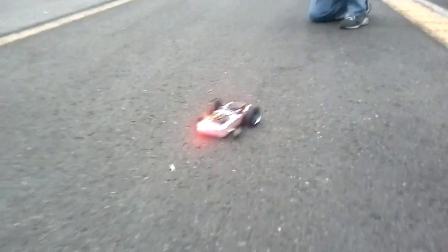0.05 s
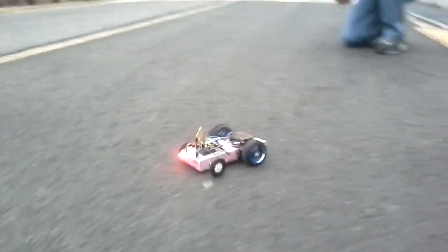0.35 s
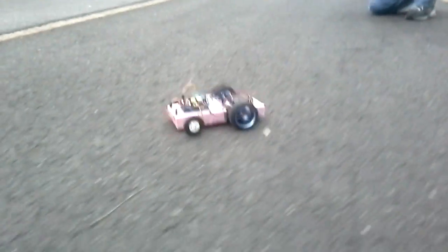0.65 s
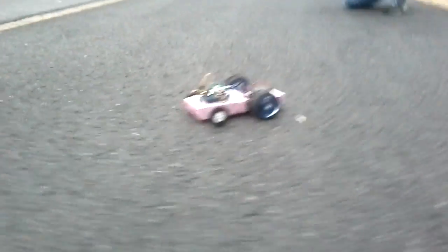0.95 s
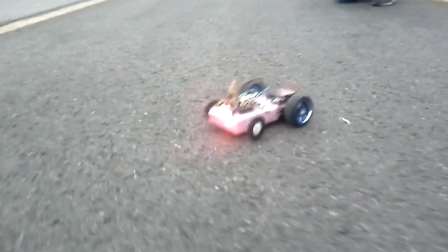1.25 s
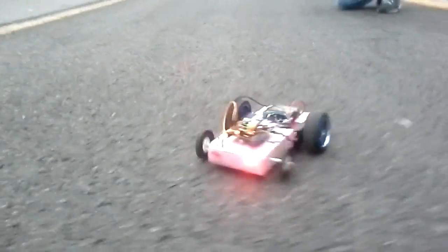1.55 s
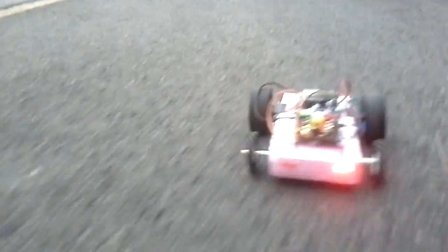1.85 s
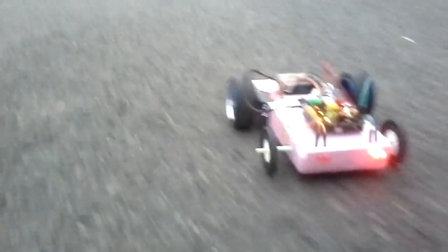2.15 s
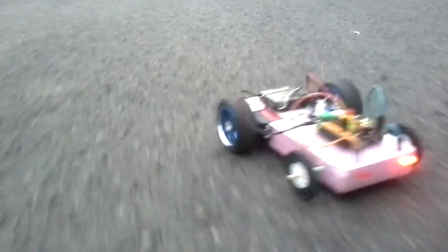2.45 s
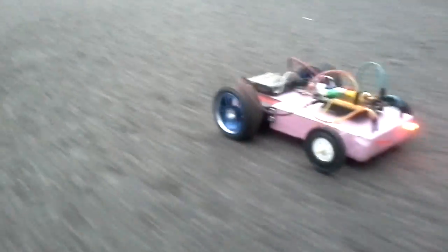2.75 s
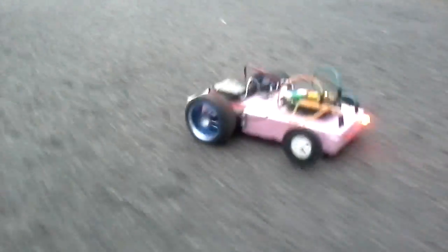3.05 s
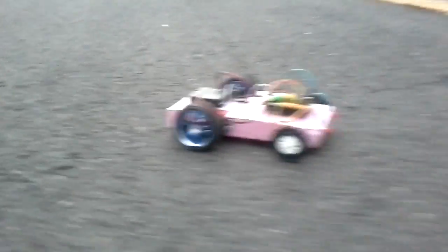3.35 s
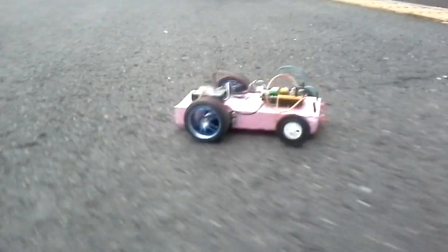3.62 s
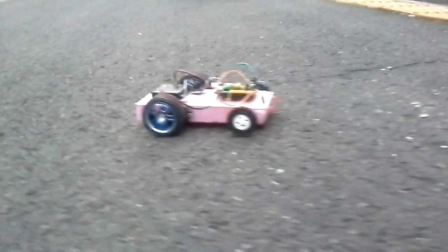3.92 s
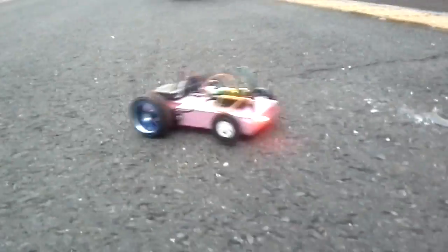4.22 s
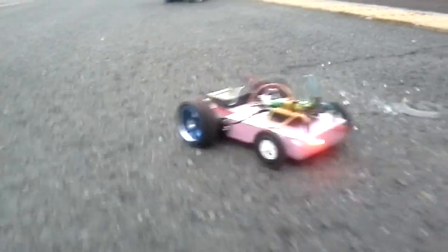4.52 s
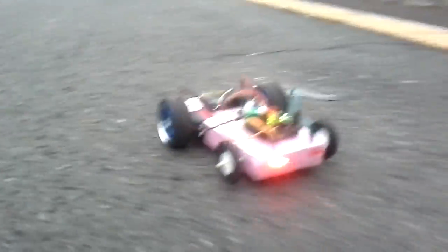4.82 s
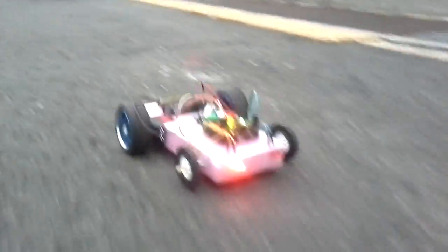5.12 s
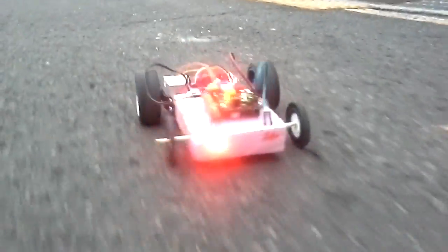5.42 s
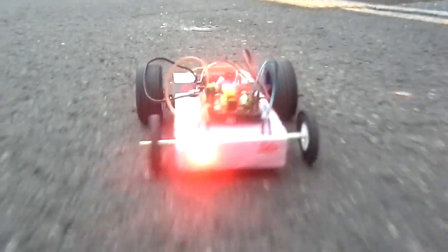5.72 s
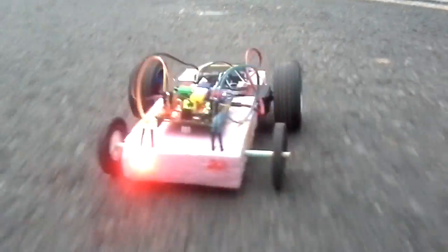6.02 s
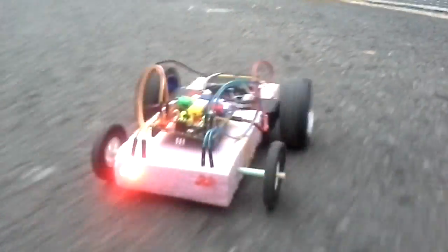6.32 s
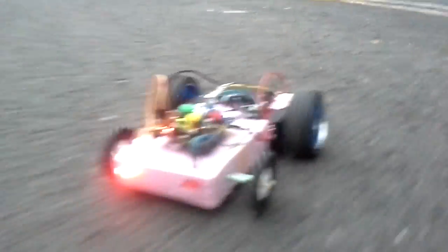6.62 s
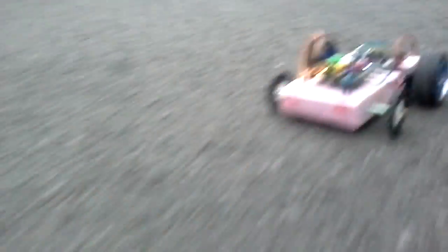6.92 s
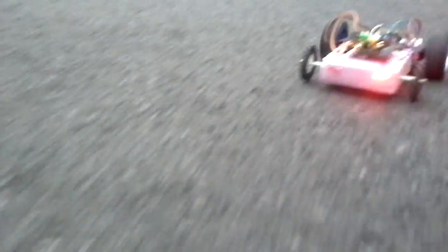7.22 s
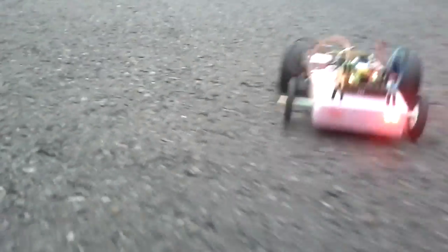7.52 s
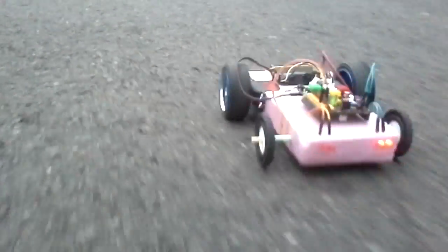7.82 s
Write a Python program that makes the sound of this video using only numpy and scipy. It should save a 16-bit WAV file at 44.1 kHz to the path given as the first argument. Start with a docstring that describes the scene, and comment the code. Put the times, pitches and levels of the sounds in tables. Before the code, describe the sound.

Small electric motors and plastic gears of a model car whine and rattle on asphalt, cutting out and restarting with sharp clicks.

```python
"""A homemade model car circles on asphalt, close to a hand-held camera's microphone, the street behind.
It opens under power: plastic gears whine and rattle, and the pulsed supply sings a fixed note. At 0.7 s
the motors cut, the car coasts and the hand bumps the camera. A long run and two blips follow, with grit
snapping under the wheels. From 4 s the gears squeal under load; three short bursts pass nearest the
microphone, slack gears chattering between them, and a last run starts just after 7 s."""
import sys
import numpy as np
from scipy import signal
from scipy.fft import rfft, irfft, next_fast_len
from scipy.io import wavfile
from scipy.ndimage import uniform_filter1d, map_coordinates

SR = 44100
rng = np.random.default_rng(int(sys.argv[2]) if len(sys.argv) > 2 else 0)


def transcribe(u):
    """Save the signal u as a 16-bit wav file named by the first command-line argument.

    u: samples, shape (n,) or (channels, n), limited to [-1, 1]; the rate is SR.
    q: integer samples, one column per channel.
    """
    v = np.clip(np.atleast_2d(u).T, -1, 1)
    q = np.round(v * 32767).astype(np.int16)
    wavfile.write(sys.argv[1], SR, q)


N = 347067


def amp(db):
    """Decibels to gain."""
    return 10 ** (np.asarray(db) / 20)


def unit(x):
    """Scaled to rms 1."""
    return x / np.sqrt(np.mean(x ** 2) + 1e-20)


def clock():
    """The time of each sample in seconds."""
    return np.arange(N) / SR


def curves(rows):
    """One value per sample for each column after the time."""
    times, *columns = np.transpose(rows)
    return [np.interp(clock(), times, column) for column in columns]


def wobble(rate_hz):
    """A smooth random curve with rate_hz knots a second."""
    return map_coordinates(rng.standard_normal(int(N * rate_hz / SR) + 4), [clock() * rate_hz])


def colour(x, response):
    """x through a response of (freq_hz, gain_db) points, at rms 1."""
    size = next_fast_len(N + 8192)
    hz, db = np.transpose(response)
    gain = amp(np.interp(np.log(np.fft.rfftfreq(size, 1 / SR) + 1), np.log(hz), db))
    return unit(irfft(rfft(x, size) * gain, size)[:N])


def noise(response):
    """Coloured noise of rms 1."""
    return colour(rng.standard_normal(N), response)


def gate(on, off, edge_s):
    """1 between two times, with sloping edges."""
    return np.clip(np.minimum(clock() - on, off - clock()) / edge_s + .5, 0, 1)


def add(track, start_s, sound):
    """Mix a short sound in at a time."""
    part = track[round(start_s * SR):][:len(sound)]
    part += sound[:len(part)]


def impacts(per_s, spread_db):
    """Tiny random impacts of uneven size."""
    hits = (rng.random(N) < per_s / SR) * rng.standard_normal(N)
    return unit(hits * amp(spread_db * rng.standard_normal(N)))


# Spectrum of the street, well behind the car: freq_hz, gain_db
STREET_SPECTRUM = [(30, -48), (55, -14), (80, -17), (113, -3.5), (143, -2.5), (430, -3.5), (540, -7.5),
                   (735, -3.5), (1300, -12), (1700, -21), (2200, -19.5), (6000, -19), (10000, -21.5),
                   (15000, -29)]
def street(level_db=-40):
    """Outdoor hum all around the microphone, wavering slightly."""
    return amp(level_db + 2.5 * wobble(10)) * noise(STREET_SPECTRUM)


# Coarse and smooth asphalt along the way: time_s, level_db
ROAD_ROUGHNESS = [(0, -38.5), (.7, -35.5), (1.4, -37), (2.1, -32.5), (3.4, -37), (4, -36), (4.9, -45.5),
                  (5.5, -34.5), (6.5, -34), (7, -38), (7.87, -32.5)]
# Spectrum of the tyres on the ground: freq_hz, gain_db
TYRE_SPECTRUM = [(30, -55), (100, -18.5), (250, -6), (450, -5), (540, 3), (650, -5.5), (850, -1.5),
                 (1100, -2), (1600, -6.5), (2200, -16), (3500, -50)]
def tyres(trim_db=-3):
    """Tyres on the road, louder where it is coarser."""
    level_db, = curves(ROAD_ROUGHNESS)
    return amp(level_db + trim_db + 1.95 * wobble(30)) * noise(TYRE_SPECTRUM)


# Bumps on the camera body: start_s, peak_db, pitch_hz, sag_fraction
CAMERA_BUMPS = [(0.7783, -16, 450, 0.95), (1.009, -12.5, 580, 0.74), (1.416, -22.5, 440, .4),
                (2.267, -12, 383, 0.37), (2.927, -13.5, 538, .45), (2.9582, -14, 664, 0.7),
                (3.057, -17, 1270, 0.3), (3.1171, -6.5, 470, 0.67), (3.434, -18, 332, .15),
                (5.402, -17.5, 403, 0.28), (7.171, -17, 351, 0.14)]
# Fingers rubbing on the camera: start_s, end_s, level_db
FINGER_RUBS = [(1.155, 1.166, -28.5), (1.17, 1.211, -25.5), (2.922, 2.966, -25), (7.147, 7.207, -25)]
# Response of the camera case: freq_hz, gain_db
CASE_RESPONSE = [(30, -55), (70, -41), (150, -5.5), (280, 3.5), (600, 0), (1000, -8), (1500, -15),
                 (4000, -23)]
def handling(settle_s=.0026, decay_cycles=10, attack_s=.00026):
    """Right at the microphone: dull bumps that sink in pitch as the case gives, and short finger rubs."""
    track, t = np.zeros(N), np.arange(SR // 20) / SR
    for start, db, hz, sag in CAMERA_BUMPS:
        pitch_hz = hz * (1 - sag + 2 * sag * np.exp(-t / settle_s))
        envelope = amp(-60 * t * hz / decay_cycles) * (1 - np.exp(-t / attack_s))
        bump = -np.sin(2 * np.pi * np.cumsum(pitch_hz) / SR) * envelope
        add(track, start, amp(db) * bump / abs(bump).max())
    rubbing = sum(amp(db) * gate(on, off, edge_s=.0014) for on, off, db in FINGER_RUBS)
    return track + rubbing * colour(impacts(per_s=3500, spread_db=2), CASE_RESPONSE)


# Snaps of grit and gears, down at the road: start_s, level_db, ring_hz, knock_vs_crack_db
GRIT_SNAPS = [(.7521, -5, 6440, -33), (0.7876, -12, 5970, -4.5), (1.532, -2.5, 7200, -32),
              (2.2667, -9, 5600, -5), (2.9937, -8, 8800, -27), (3.0433, -7.3, 6040, 4.2),
              (3.117, -14, 2050, 4.5), (3.394, -1.5, 6860, -15.5), (3.4834, -17, 7000, -14),
              (4.3355, -4, 6500, -38.5), (4.3448, -4.5, 7490, -29), (5.077, -3.5, 8600, -20),
              (5.1367, -9, 5600, -6), (5.7091, -10, 5500, -22.5), (6.766, -3.5, 5860, -8.5),
              (6.7707, -2, 6390, -23), (7.141, -3, 6440, -22), (7.4423, -7.5, 6580, -28)]
# Modes of the knocked frame: pitch_hz, level_db, t60_s
FRAME_MODES = [(1330, 0, .008), (1900, -5, .004), (2600, -5, .006), (4100, -8, .005)]
def snaps(t60_s=.0047, attack_s=.00012, ring_q=6.3):
    """Each snap is a very short bright crack that also knocks the frame."""
    track, t = np.zeros(N), np.arange(SR // 30) / SR
    onset = 1 - np.exp(-t / attack_s)
    modes = [amp(db - 60 * t / t60) * np.sin(2 * np.pi * hz * t) for hz, db, t60 in FRAME_MODES]
    knock = onset * sum(modes)
    knock /= abs(knock).max()
    for start, db, hz, knock_db in GRIT_SNAPS:
        burst = rng.standard_normal(len(t)) * amp(-60 * t / t60_s) * onset
        crack = signal.lfilter(*signal.iirpeak(hz, ring_q, SR), burst)
        add(track, start, amp(db) * (crack / abs(crack).max() + amp(knock_db) * knock))
    return track


# The car's circle as heard from the microphone: time_s, near_db, facing_db
CAR_PATH = [(0, -8.5, -1.5), (.55, -7, 3), (1.2, -7.5, -1), (1.8, 1.4, -3), (2.3, -0.8, 5),
            (2.7, -1.3, 4.5), (3.3, -3.5, 0), (3.55, 0.5, -6.5), (3.7, -3.5, 4), (4.1, -3.5, -0.5),
            (4.5, -1.1, 1), (4.97, -0.5, -0.5), (5.5, 5, -4), (6, 3, -0.5), (6.6, 4, 4), (7.25, -0.5, -5),
            (7.6, 1, 0), (7.87, 0.5, 1.5)]
def circling():
    """Gains in dB as the car comes near, and as its motor housing turns to face the microphone."""
    return curves(CAR_PATH)


# Bursts of motor power: on_s, off_s, start_tooth_hz, full_tooth_hz, frame_db, gearbox_db, housing_db,
# whine_vs_rattle_db, note_vs_gearbox_db, fizz_vs_housing_db, buzz_vs_frame_db, switching_db
MOTOR_RUNS = [ (-.06, .705, 1240, 1510, -29, -29, -25.5, 6, -5.5, -5, -13, -34.5),
              (1.171, 2.983, 700, 1516, -26, -28.5, -24, 1.5, -24, -19.5, -18, -34.5),
              (3.126, 3.348, 1060, 1590, -23, -32.5, -24, 0.5, -17, -4.5, -24, -41),
              (3.486, 3.691, 850, 1410, -29.5, -37.5, -27.5, 4, -22, -2, -23, -43.5),
              (4.046, 4.974, 560, 1494, -30.5, -27, -27, 3, -6, -8, -2.5, -40.5),
              (5.132, 5.542, 1330, 1500, -29.5, -25, -25.5, 5, -10.5, -13.5, -2, -50),
              (5.704, 6.071, 1325, 1470, -26.5, -24.5, -26, 3.5, -8, -11, -5.5, -39),
              (6.239, 6.608, 1366, 1430, -26.5, -30.5, -31.5, 3.5, -0.5, -4.5, -2, -36),
              (7.136, 7.999, 720, 1550, -28, -30, -22.5, 3.5, -30, -18.5, -20, -32.5), ]
def motor_state(spin_up_s=.145):
    """The motors run up after each switch-on: its age, the tooth rate, the load and the run's levels."""
    runs = np.array(MOTOR_RUNS)
    latest = np.maximum(np.searchsorted(runs[:, 0] - .02, clock()) - 1, 0)
    on, _, start_hz, full_hz, *levels = runs[latest].T
    age_s = clock() - on
    tooth_hz = full_hz + (start_hz - full_hz) * np.exp(-age_s / spin_up_s)
    return age_s, tooth_hz, 1 - tooth_hz / full_hz, levels


def power():
    """1 while the motors are fed."""
    return sum(gate(on, off, edge_s=.005) for on, off, *_ in MOTOR_RUNS)


# Free rolling after each cut: start_s, slowing_s, rolling_db, slowed_db
FREE_ROLLS = [(.705, 0.743, -32, -42.5), (2.979, 3.013, -29.5, -37), (3.345, 3.36, -26.5, -39),
              (3.693, 3.687, -30, -63), (4.974, 5.126, -40.5, -43), (5.542, 5.7, -31, -42),
              (6.074, 6.23, -29.5, -42), (6.608, 6.808, -30.5, -46)]
# Slack gears knocking: start_s, level_db
SLACK_KNOCKS = [(1.2316, -13.5), (3.4332, -26), (5.036, -12), (5.443, -3), (5.524, -4.5), (5.5968, -9.5),
                (5.636, -15), (6.126, -19), (6.2179, -23), (6.637, -21), (6.677, -16), (6.724, -22),
                (6.762, -17), (7.839, -4)]
# Spectrum of the ticking gears: freq_hz, gain_db
TICK_SPECTRUM = [(900, -30), (1600, -10), (2200, -5), (3000, -2.5), (4300, 0), (6300, 1), (7500, -4),
                 (9000, -11), (14000, -21), (15500, -35)]
def coasting(roll_trim_db=-1, slowing_db_per_s=111, knock_trim_db=-10, knock_t60_s=.037):
    """Unpowered gears tick over until the wheels slow, and clatter whenever their slack is taken up."""
    level_db = np.zeros(N)
    for start, slows, db, slowed_db in FREE_ROLLS:
        fading_db = np.maximum(db - slowing_db_per_s * np.maximum(clock() - slows, 0), slowed_db)
        level_db = np.where(clock() > start - .05, fading_db, level_db)
    unpowered = 1 - np.minimum(power(), 1)
    envelope = unpowered * amp(level_db + roll_trim_db + 2 * wobble(60))
    near_db, _ = circling()
    # just after each switch-on, the play of the gears closes with a clunk
    clunks = [(on + .0044, near_db[round(on * SR)] - 10) for on, *_ in MOTOR_RUNS if on > 0]
    t = np.arange(SR // 10) / SR
    for start, db in SLACK_KNOCKS + clunks:
        add(envelope, start, amp(db + knock_trim_db - 60 * t / knock_t60_s))
    return envelope * colour(impacts(per_s=8600, spread_db=0), TICK_SPECTRUM)


# Partials of the singing windings: switching_multiple, level_db
WINDING_PARTIALS = [(2, -12), (3, -13), (4, -1), (5, 0), (6, 1), (8, -3), (9, -8), (10, -4.5), (11, -4),
                    (12, -10), (13, -10), (14, -19)]
def windings(switching_hz=976.9, doppler=.0004, waver_db=3.5, pull_db=10.5, upper_db=-39):
    """The chopped supply makes the windings sing, most under load; partials waver as the car turns."""
    _, _, load, (*_, lower_db) = motor_state()
    near_db, _ = circling()
    phase = 2 * np.pi * switching_hz * np.cumsum(1 + doppler * wobble(8)) / SR
    partials = [amp(db + waver_db * wobble(8.5)) * np.sin(k * phase + rng.uniform(0, 2 * np.pi))
                for k, db in WINDING_PARTIALS]
    lower = amp(lower_db + near_db) * unit(sum(partials[:5]))
    upper = amp(upper_db + .92 * near_db) * unit(sum(partials[5:]))
    return power() * amp(pull_db * load) * (lower + upper)


# Gears squealing under load: start_s, end_s, start_hz, end_hz, level_db
GEAR_SQUEALS = [(-.02, .17, 2630, 2820, -37), (.42, .6, 4700, 4600, -32), (4.12, 4.26, 1650, 2500, -41),
                (4.14, 4.32, 3150, 4050, -37), (4.24, 4.33, 2560, 2680, -36), (5.138, 5.2, 2640, 2640, -26),
                (5.712, 5.78, 2610, 2660, -26), (6.28, 6.58, 5350, 5750, -32),
                (7.15, 7.42, 3960, 3990, -33), (7.22, 7.35, 3740, 3720, -34), (7.48, 7.8, 5350, 5750, -30)]
def squeals(waver=.018, rasp_db=4):
    """A straining gear catches a resonance, wavers, rasps and slides, mostly upward."""
    track = np.zeros(N)
    for on, off, start_hz, end_hz, db in GEAR_SQUEALS:
        pitch_hz = np.interp(clock(), [on, off], [start_hz, end_hz])
        phase = 2 * np.pi * np.cumsum(pitch_hz * (1 + waver * wobble(200))) / SR
        squeal = unit(np.sin(phase) * amp(rasp_db * wobble(80)))
        track += amp(db) * gate(on, off, edge_s=.012) * squeal
    return track


def gear_rattle(depth_db=2.8):
    """Dense impacts; narrow resonances of loose parts take turns to ring for hundredths of a second."""
    spectrum = signal.stft(impacts(per_s=14000, spread_db=2), nperseg=1024)[2]
    resonances = uniform_filter1d(rng.standard_normal(spectrum.shape), size=4, axis=0)
    resonances = unit(uniform_filter1d(resonances, size=2, axis=1))
    return unit(signal.istft(spectrum * amp(depth_db * resonances), nperseg=1024)[1][:N])


# Partials of the meshing teeth: tooth_rate_multiple, level_db
WHINE_PARTIALS = [(.75, 5), (1.25, -6), (1.5, -7), (1.75, -10), (2, 1.5), (3, 1), (4, -3.5), (5, -1),
                  (6, -9)]
def gear_whine(tooth_phase, warble_db=3):
    """Meshing teeth sound warbling harmonics, with quarter orders from uneven teeth."""
    return unit(sum(amp(db + warble_db * wobble(60)) * np.sin(k * tooth_phase + rng.uniform(0, 2 * np.pi))
                    for k, db in WHINE_PARTIALS))


# Responses of the car's radiating parts, each: freq_hz, gain_db
FRAME_RESPONSE = [(500, -26), (1200, -17.5), (1850, -1), (2050, -2.5), (2250, 1.5), (2430, -3.5), (2650, 0),
                  (3000, 7), (3350, 2), (3900, -65), (5000, -100)]
FRAME_BUZZ = [(2200, -58), (2500, 1), (2630, 9), (2760, -1), (3100, -73)]
GEARBOX_RESPONSE = [(2700, -58), (3400, -1.5), (3750, 3), (4100, 6.5), (4350, 5), (4650, -0.5), (5000, 0),
                    (5600, -46), (7500, -65)]
HOUSING_RESPONSE = [(3500, -35), (4600, -17), (5100, -5), (5700, 0), (6150, 0), (6600, -4), (7200, -7.5),
                    (8000, -14), (9500, -22), (14000, -40)]
HOUSING_FIZZ = [(6000, 1.5), (8500, 3), (9800, -2.5), (11300, 4.5), (12500, -4), (14000, -1.5),
                (15500, -61)]
def gears(reference_hz=1539, loosen_db_per_s=5, wander=.009, jitter=.01713, teeth_per_turn=18):
    """Close up: frame, gearbox and motor housing radiate whine and rattle, louder when fast and near."""
    age_s, tooth_hz, _, levels = motor_state()
    frame_db, gearbox_db, housing_db, whine_db, note_db, fizz_db, buzz_db, _ = levels
    near_db, facing_db = circling()
    speed_octaves = np.log2(tooth_hz / reference_hz)
    frame_db = frame_db + near_db + 15.5 * speed_octaves
    gearbox_db = gearbox_db + near_db + 9.5 * speed_octaves
    housing_db = housing_db + near_db + facing_db + 11.5 * speed_octaves
    # teeth mesh cleanly under load, then rattle more as they run light
    clean = amp(whine_db - loosen_db_per_s * age_s)
    # the rough road loads the motor unevenly, and loose teeth meet early or late
    tooth_phase = 2 * np.pi * np.cumsum(tooth_hz * (1 + wander * wobble(70) + jitter * wobble(420))) / SR
    # an off-centre wheel presses harder once a turn
    pressure = unit(amp(np.sin(tooth_phase / teeth_per_turn) + wobble(55) + wobble(400)))
    whine, rattle = gear_whine(tooth_phase), gear_rattle()

    def radiate(part, whine_ratio):
        """Whine and rattle through one part, at constant total power."""
        return (whine_ratio * colour(whine, part) + colour(rattle, part)) / np.sqrt(1 + whine_ratio ** 2)

    # the higher a part rings, the more of its sound is rattle
    frame = radiate(FRAME_RESPONSE, clean) + amp(buzz_db) * colour(rattle, FRAME_BUZZ)
    gearbox = radiate(GEARBOX_RESPONSE, .7 * clean)
    housing = radiate(HOUSING_RESPONSE, .65 * clean) + amp(fizz_db) * colour(rattle, HOUSING_FIZZ)
    body = amp(frame_db - 4.5) * frame + amp(gearbox_db - 1) * gearbox + amp(housing_db - 1) * housing
    # the tooth note itself slips about, and only carries near full speed
    note = unit(np.sin(tooth_phase + .7 * wobble(130)) * amp(3 * wobble(160)))
    carry_db = np.interp(tooth_hz, [1200, 1440], [-20, 0])
    return power() * pressure * (body + amp(gearbox_db + note_db + carry_db) * note)


def scene():
    """Car, hand and street reach one microphone, the same in both channels."""
    car = gears() + squeals() + windings() + coasting() + snaps()
    sound = car + handling() + street() + tyres()
    return np.array([sound, sound])


def record(dry):
    """The small microphone loses deep bass; the camera keeps nothing above its band limit."""
    bass_hz, top_hz = 91, 15000
    sound = signal.lfilter(*signal.butter(2, bass_hz, "high", fs=SR), dry)
    size = next_fast_len(N + 8192)
    passband = np.fft.rfftfreq(size, 1 / SR) < top_hz
    return irfft(rfft(sound, size) * passband, size)[:, :N]


dry = scene()
out = record(dry)
transcribe(out)
```